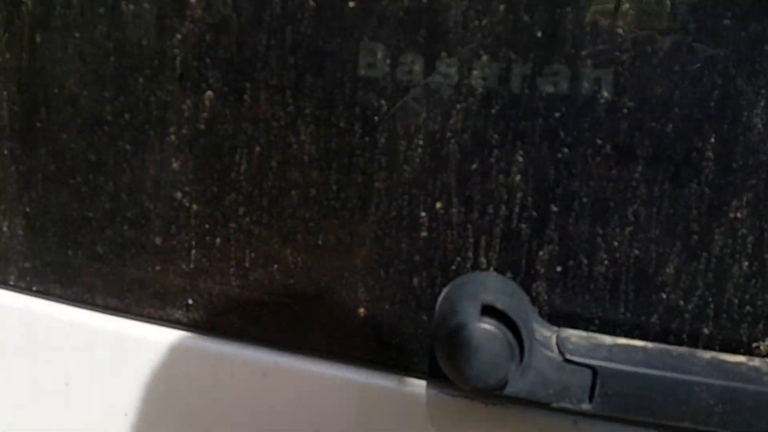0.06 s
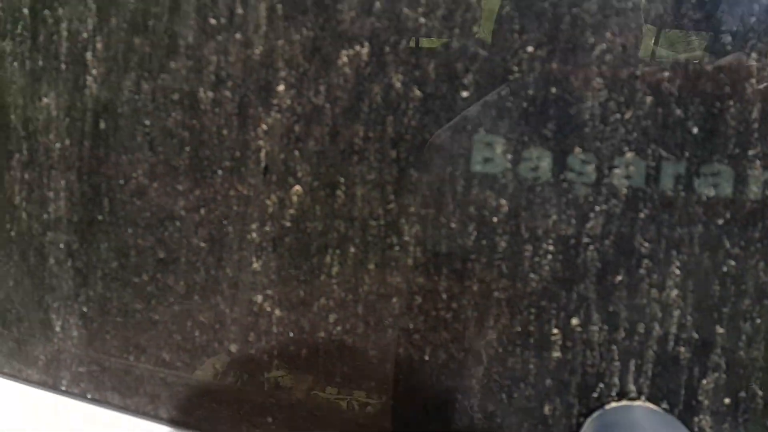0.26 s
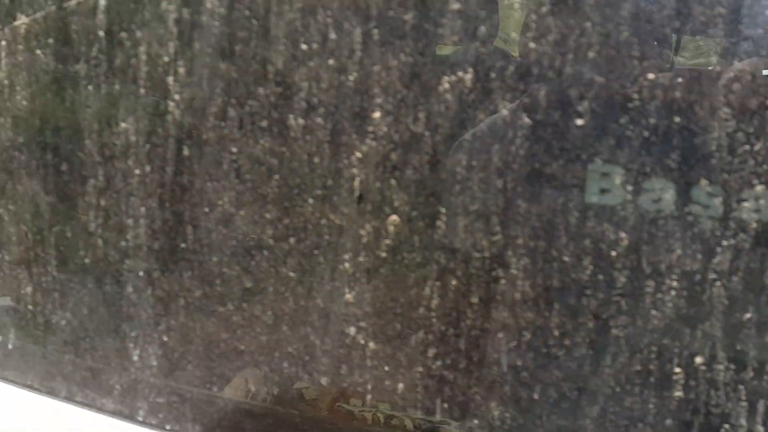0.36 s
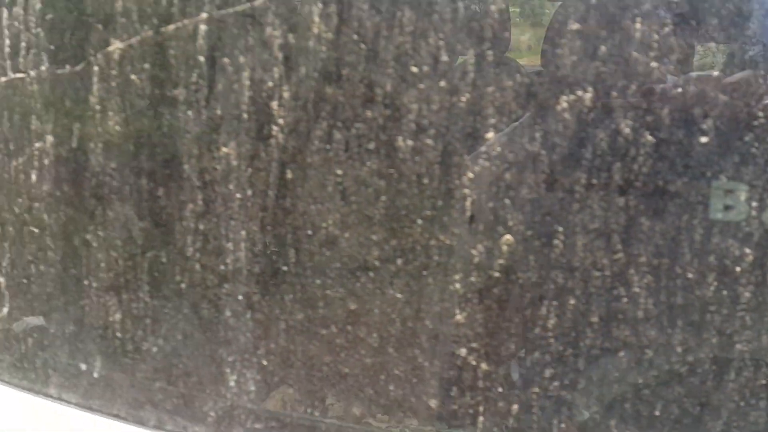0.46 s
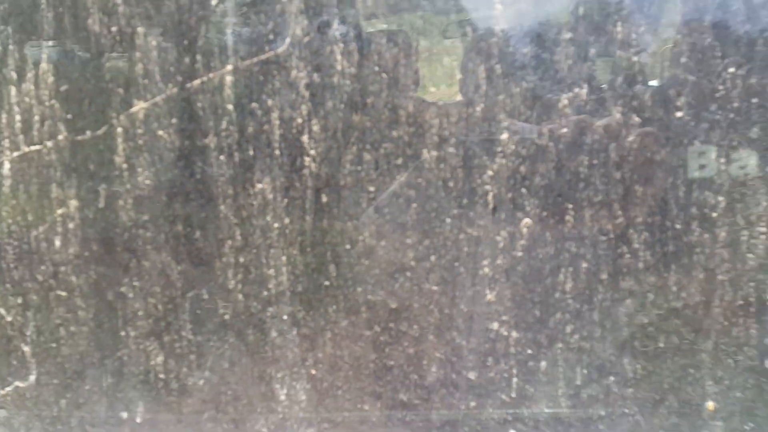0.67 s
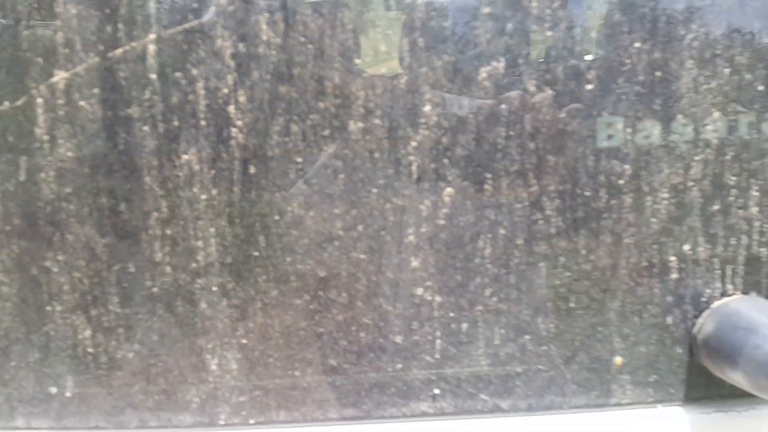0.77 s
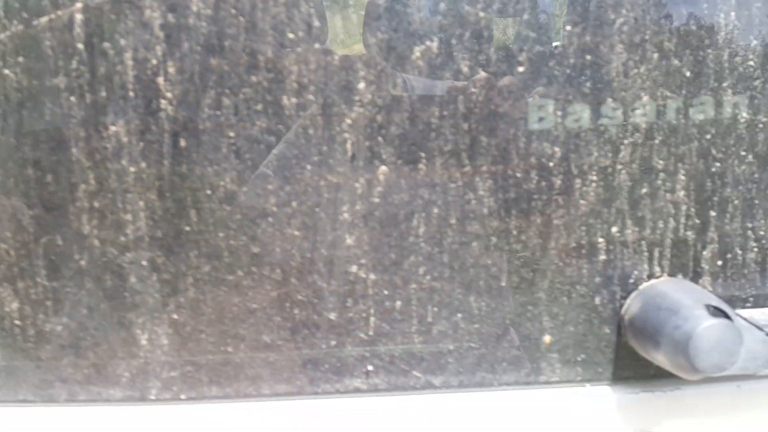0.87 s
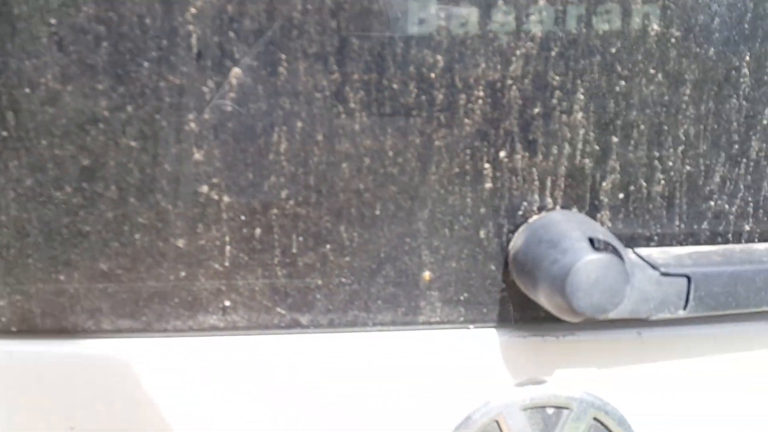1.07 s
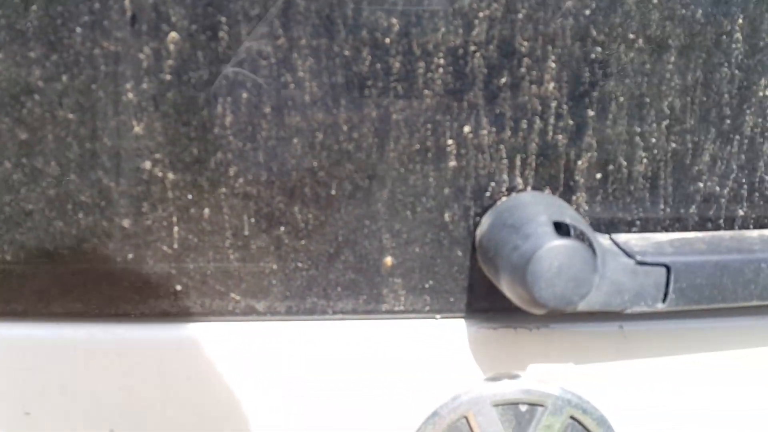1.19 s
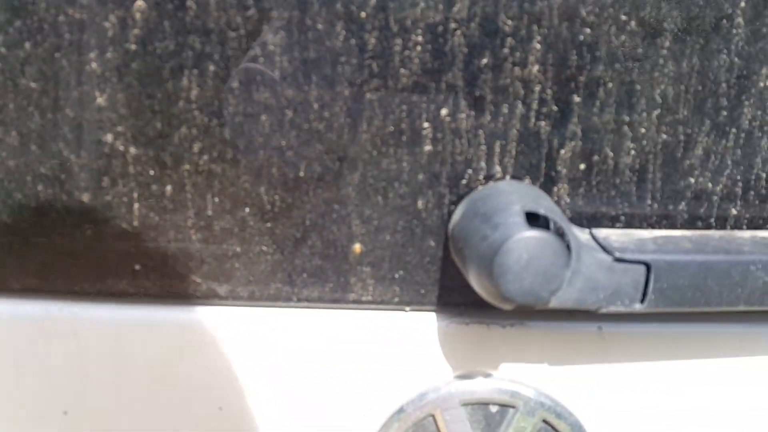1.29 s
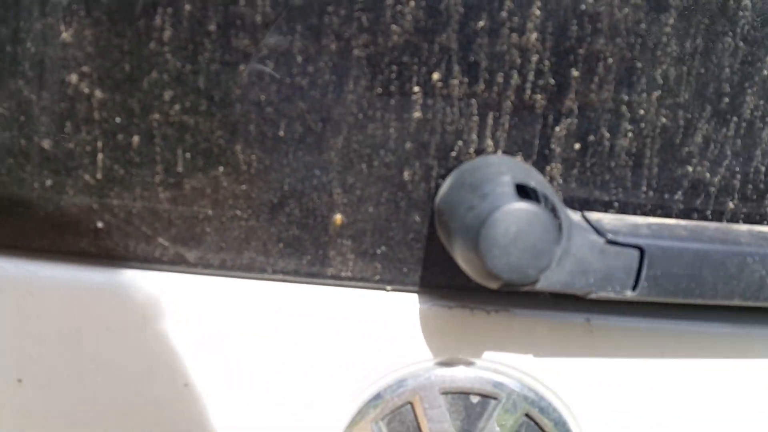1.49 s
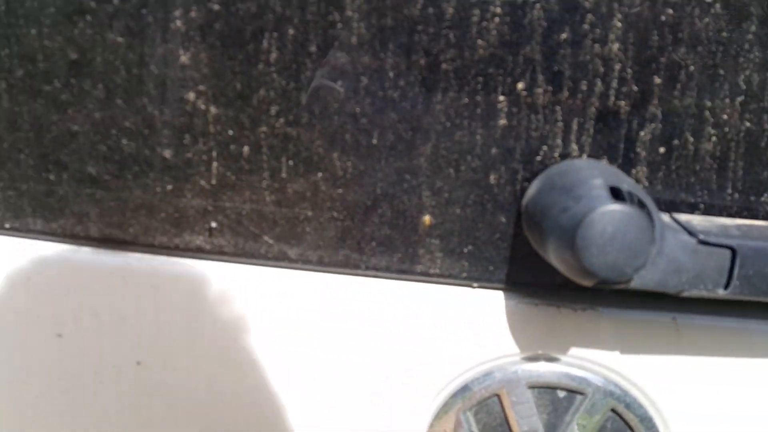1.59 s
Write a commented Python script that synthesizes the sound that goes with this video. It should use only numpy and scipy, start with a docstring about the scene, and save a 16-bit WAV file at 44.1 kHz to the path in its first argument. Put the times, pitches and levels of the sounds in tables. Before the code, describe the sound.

A van tailgate thuds heavily as its metal latch clacks without catching, light knocks before and after, then low handling bumps on the right and a sharp double click, close up in quiet open air.

```python
"""Van tailgate pushed down outdoors

The latch clacks on its striker without catching, as cracks, steel modes and a chattering ring. The door thuds as
panel modes, shudder noise and a cabin boom; its fittings tick and lighter knocks come before and after. Windowed
cosines bump the right microphone over a low rumble, and a hard edge close by slips and snaps in a scraping click.
Faint grainy scuffs, a narrow hush and two peeps lie over quiet open-air noise.
"""
import sys
import numpy as np
from scipy import signal
from scipy.fft import rfft, irfft
from scipy.io import wavfile

SR = 44100
rng = np.random.default_rng(int(sys.argv[2]) if len(sys.argv) > 2 else 0)


def wav_record(signal):
    """Record a signal, one row per channel, as 16-bit PCM in the file named by sys.argv[1]."""
    frames = np.transpose(np.atleast_2d(signal))
    bounded = np.clip(frames, -1, 1)
    # unit amplitude maps onto the largest positive 16-bit level
    quanta = np.round(bounded * 32767).astype(np.int16)
    wavfile.write(sys.argv[1], SR, quanta)


N = 72765

# place of the door: (frequency [Hz], left minus right [dB])
DOOR_SIDE = [(100, -.5), (600, -1.5), (1300, -5.5), (3000, -1), (5500, -9), (9000, -1)]
# unevenness of rubbing and length of one grain
RUB_GRAIN_DB, RUB_GRAIN_S = 4, 0.004


def amp(db):
    """Decibels to gain."""
    return 10 ** (np.asarray(db) / 20)


def unit(x):
    """Scales to rms 1."""
    return x / np.sqrt(np.mean(x ** 2) + 1e-20)


def read(points, hz):
    """Reads a table on a log-frequency axis."""
    f, value = np.transpose(points)
    return np.interp(np.log(hz + 1), np.log(f + 1), value)


def add(mix, s, sound):
    """Mixes a sound in at time s, cut at the end of the mix."""
    part = mix[:, round(s * SR):][:, :sound.shape[-1]]
    part += sound[..., :part.shape[1]]


def decay(t, t60):
    """Exponential fall of 60 dB in t60."""
    return np.exp(-np.log(1000) * t / max(t60, 1e-4))


def tilted(spectrum, hz, tilt_db):
    """A spectrum in dB, tilted by tilt_db per octave above 1 kHz."""
    return read(spectrum, hz) + tilt_db * np.log2(np.maximum(hz, 1000) / 1000)


def noise(spectrum, size, tilt_db=0, door=True):
    """Coloured stereo noise of rms 1, with the door's left-right balance or an even one."""
    # left-right likeness: (frequency [Hz], likeness [0-1])
    likeness = [(100, 0.98), (350, 0.91), (800, 0.24), (2500, 0)]
    hz = np.fft.rfftfreq(size, 1 / SR)
    a, b = np.exp(2j * np.pi * rng.random((2, len(hz))))
    same = np.clip(read(likeness, hz), 0, 1)
    side_db = read(DOOR_SIDE, hz) / 2 * door
    left = (same * a + np.sqrt(1 - same ** 2) * b) * amp(side_db)
    right = a * amp(-side_db)
    return unit(irfft(np.array([left, right]) * amp(tilted(spectrum, hz, tilt_db)), size))


def grains(size, depth_db, grain_s):
    """A gain that wanders at random from grain to grain."""
    grain = np.arange(size) / SR / grain_s
    return amp(depth_db * np.interp(grain, np.arange(size), rng.standard_normal(size)))


def swell(levels, spectrum):
    """Noise that follows a slow level curve."""
    level_db = np.interp(np.arange(N) / SR, *np.transpose(levels))
    return amp(level_db) * noise(spectrum, N, door=False)


def burst(spectrum, ring, rise_s, tilt_db=0, stretch=1, size=SR // 2):
    """Many close modes struck at once, as noise whose octaves die at their own speeds."""
    t, hz = np.arange(size) / SR, np.fft.rfftfreq(size, 1 / SR)
    centres = 2 ** np.arange(6, 15)
    z = rfft(noise(spectrum, size, tilt_db))
    out = 0
    for centre in centres:
        # overlapping triangular bands that sum to one
        band = irfft(z * read(np.c_[centres, centres == centre], hz), size)
        out = out + band * decay(t, read(ring, centre) * stretch)
    return out * np.minimum(t / rise_s, 1)


def modes(table, rise_s, stretch=1):
    """A struck body: a sum of dying partials."""
    t = np.arange(SR // 2) / SR
    partials = sum(amp(db) * np.cos(2 * np.pi * hz * t) * decay(t, t60 * stretch) for hz, db, t60 in table)
    return np.minimum(t / rise_s, 1) * partials


def crack(spectrum, tilt_db=0, door=True, size=2048):
    """One hard contact, at the door or close by: a coloured minimum-phase impulse of peak 1."""
    hz = abs(np.fft.fftfreq(size, 1 / SR))
    side_db = door * np.outer([1, -1], read(DOOR_SIDE, hz)) / 2
    gain = amp(tilted(spectrum, hz, tilt_db) + side_db)
    minimum_phase = np.exp(np.conj(signal.hilbert(np.log(gain))))
    pulse = np.fft.ifft(minimum_phase).real[:, :size // 2]
    return pulse / abs(pulse).max()


def outdoors(air_db=-55, glide_hz=120):
    """Steady coloured noise for open air; two faint peeps arch in level and pitch."""
    # open air: (frequency [Hz], relative density [dB])
    air = [(25, -5), (100, 0), (300, -7.5), (700, -10.5), (1500, -18), (3500, -24), (5500, -22),
           (8000, -34.5), (15500, -31)]
    # peeps: (time [s], length [s], top pitch [Hz], level before the left-right gains [dB])
    peeps = [(1.355, 0.061, 4380, -59.5), (1.585, 0.042, 4420, -60)]
    out = amp(air_db) * noise(air, N, door=False)
    for s, length_s, top_hz, db in peeps:
        arch = np.sin(np.pi * np.arange(0, length_s, 1 / SR) / length_s)
        phase = 2 * np.pi * np.cumsum(top_hz + glide_hz * (arch - 1)) / SR
        add(out, s, amp(db) * amp([[-6], [3]]) * arch * np.sin(phase))
    return out


def hush():
    """A narrow band of grainy noise swells under the last scuff."""
    # swell: (time [s], level before graining [dB])
    hush_level = [(1.33, -70), (1.5, -50.5), (1.65, -60.5)]
    # colour: (frequency [Hz], relative density [dB])
    hush_colour = [(700, -18), (1500, 8), (2200, -23)]
    return swell(hush_level, hush_colour) * grains(N, RUB_GRAIN_DB, RUB_GRAIN_S)


def scuffs(rise_s=0.0053, fall_s=0.069):
    """Soft rubbing: noise made uneven by random grains."""
    # strokes: (time [s], length [s], level [dB], treble tilt [dB/octave])
    strokes = [(0.683, 0.075, -39.5, 2.5), (0.697, 0.26, -56, 5), (1.488, 0.17, -41.5, 1.5)]
    # colour: (frequency [Hz], relative density [dB])
    scuff_colour = [(30, 3), (110, 17), (350, 10), (800, 4), (1500, -0.5), (2200, -6.5), (5500, -14.5),
                    (8000, -31.5), (15000, -34)]
    out, t = np.zeros((2, N)), np.arange(SR // 2) / SR
    for s, length_s, db, tilt_db in strokes:
        shape = np.clip(np.minimum(t / rise_s, (length_s - t) / fall_s), 0, 1)
        rub = grains(len(t), RUB_GRAIN_DB, RUB_GRAIN_S) * noise(scuff_colour, len(t), tilt_db, door=False)
        add(out, s, amp(db) * shape * unit(rub))
    return out


def rumble(left_db=-12):
    """Low noise, mostly on the right microphone, follows the moving hand."""
    # swell: (time [s], level before the left-right gains [dB])
    rumble_level = [(0, -45.5), (.1, -32), (.21, -35), (.64, -48), (.8, -57.5), (.92, -30), (1.15, -40.5),
                    (1.35, -56)]
    # colour: (frequency [Hz], relative density [dB])
    rumble_colour = [(25, -13), (95, 7.5), (250, -5.5), (900, -52.5)]
    return swell(rumble_level, rumble_colour) * amp([[left_db], [0]])


def bumps(width_cycles=0.5, left_leak_db=-28, lead_s=0.02):
    """Touches on the right microphone: short low pressure swings under a Gaussian."""
    # touches: (centre time [s], level at right [dB], pitch [Hz])
    touches = [(0.145, -21.5, 162), (0.151, -16, 148), (0.87, -19.5, 120), (0.8998, -16, 116),
               (0.909, -17.5, 132), (0.998, -18.5, 260), (1.008, -15.5, 145), (1.0223, -16.5, 260),
               (1.0394, -10.5, 177.5), (1.049, -17, 120), (1.138, -18.5, 154), (1.169, -26, 93)]
    out = np.zeros((2, N))
    t, ports = np.arange(-lead_s, lead_s, 1 / SR), amp([[left_leak_db], [0]])
    for s, db, hz in touches:
        swing = -np.cos(2 * np.pi * hz * t) * np.exp(-(t * hz / width_cycles) ** 2)
        add(out, s - lead_s, amp(db) * ports * swing)
    return out


def click(snap_ring_hz=830, snap_ring_db=-32, snap_ring_t60_s=0.057):
    """A hard edge slips and snaps close by; the right microphone hears it later, the recorder's body shades both."""
    # slips: (time [s], level [dB], hold before decay [s], t60 [s])
    slips = [(0.765, -46.5, 0.00074, 0.011), (1.256, -51, 0.0058, 0.074), (1.291, -27.5, 0.018, 0.017),
             (1.303, -21.5, 0.0036, 0.037)]
    # snaps: (time [s], peak level before shading [dB])
    snaps = [(1.2968, -7.5), (1.308, -7.5)]
    # edge colour: (frequency [Hz], relative density [dB])
    slip_colour = [(300, -19), (820, -11), (1300, -22), (2600, -6.5), (3550, -7), (3950, -13), (5100, 2),
                   (6150, 3.5), (6700, -7), (13000, -21), (15400, -13), (16000, -33)]
    # shading: (frequency [Hz], left minus right [dB])
    slip_side = [(4500, 0), (6000, -5.5), (8200, 9), (10200, 0)]
    # delay at right: (frequency [Hz], lag [s])
    slip_lag = [(3000, .00033), (5100, .00039), (6500, .00043), (10200, .00039), (15000, .00045)]
    edge, t, hz = np.zeros((1, N)), np.arange(SR // 10) / SR, np.fft.rfftfreq(N, 1 / SR)
    for s, db, hold_s, t60_s in slips:
        scrape = noise(slip_colour, len(t), door=False)[1]
        add(edge, s, amp(db) * scrape * decay(np.maximum(t - hold_s, 0), t60_s))
    for s, db in snaps:
        add(edge, s, amp(db) * crack(slip_colour, door=False)[0])
    # low ring left by the last snap
    add(edge, snaps[-1][0], modes([(snap_ring_hz, snap_ring_db, snap_ring_t60_s)], rise_s=0.00024))
    side_db = read(slip_side, hz) / 2
    late = np.exp(-2j * np.pi * hz * read(slip_lag, hz))
    return irfft(rfft(edge) * np.array([amp(side_db), amp(-side_db) * late]), N)


def fittings(rise_s=0.0019, t60_s=0.042, skirt_db_per_octave=23):
    """Loose fittings tick: dying noise in a narrow band around each pitch."""
    # ticks: (time [s], level before the envelope [dB], pitch [Hz])
    ticks = [(.429, -30.5, 960), (.459, -36, 1110), (.486, -36, 990), (0.536, -37, 1020),
             (0.561, -38.5, 1030), (.673, -33, 1500), (1.008, -41.5, 1530), (1.499, -40.5, 1450)]
    out, t = np.zeros((2, N)), np.arange(SR // 10) / SR
    shape = np.minimum(t / rise_s, 1) * decay(t, t60_s)
    for s, db, hz in ticks:
        colour = [(f, -skirt_db_per_octave * abs(np.log2(f / hz))) for f in (20, hz, SR / 2)]
        add(out, s, amp(db) * shape * noise(colour, len(t)))
    return out


def knocks():
    """Light knocks ring the door's modes and rattle its fittings; taps only rattle them."""
    # blows: (time [s], mode level [dB], rattle level [dB], ring length factor [-])
    light_blows = [(0.036, -25.5, -32, 0.85), (0.2307, -10.5, -21.5, 0.46), (.603, -22, -24.5, 0.79)]
    # door modes: (frequency [Hz], level [dB], t60 at factor 1 [s])
    knock_modes = [(108, -15.5, 0.67), (238, 0, 0.13), (290.7, -7, 0.28), (306, 7.5, 0.023),
                   (422.3, -17, 0.33)]
    # rattle colour: (frequency [Hz], relative density [dB])
    rattle_colour = [(50, -35), (280, 14), (700, -4), (1050, 0), (1350, -9), (1650, -2.5), (3000, -13.5),
                     (5600, -18), (7500, -39), (15000, -49)]
    # ring of rattle and taps: (frequency [Hz], t60 at factor 1 [s])
    rattle_ring = [(200, 0.34), (1500, 0.19), (7000, 0.16)]
    # taps of the loose door: (time [s], level [dB], ring length factor [-])
    taps = [(0.897, -40.5, 0.68), (1.031, -30, 0.34), (1.259, -43.5, 0.22), (1.352, -42, 0.22)]
    # tap colour: (frequency [Hz], relative density [dB])
    tap_colour = [(100, -0.5), (350, 14.5), (900, 1), (3000, -7.5), (5500, -15.5), (8000, -52)]
    out = np.zeros((2, N))
    for s, db, rattle_db, stretch in light_blows:
        add(out, s, amp(db) * modes(knock_modes, rise_s=0.0036, stretch=stretch))
        add(out, s, amp(rattle_db) * burst(rattle_colour, rattle_ring, rise_s=0.0042, stretch=stretch))
    for s, db, stretch in taps:
        add(out, s, amp(db) * burst(tap_colour, rattle_ring, rise_s=0.00022, stretch=stretch))
    return out


def door(panel_db=-3.5, shudder_db=-4, cabin_hz=39, cabin_t60_s=0.36, cabin_rise_s=0.015):
    """Each blow rings the panel, shakes the bodywork and pumps the cabin air."""
    # blows: (time [s], panel and shudder level [dB], cabin boom level [dB])
    thuds = [(0.2605, -11, -30.5), (0.283, -23.5, -34), (0.3213, -13.5, -30.5), (.334, -15.5, -22.5)]
    # panel modes: (frequency [Hz], relative level [dB], t60 [s])
    panel_modes = [(83.8, -8.5, 0.17), (120, -1, 0.39), (181.1, -5.5, 0.36), (260, -0.5, 0.25),
                   (283, -10, 0.19), (324.5, -4.5, 0.14), (463.7, -10.5, 0.23), (563, -25, 0.3)]
    # bodywork colour: (frequency [Hz], relative density [dB])
    shudder_colour = [(25, -31), (70, -4), (130, 0.5), (300, 1), (450, -12.5), (700, -18), (1500, -60.5)]
    # bodywork ring: (frequency [Hz], t60 [s])
    shudder_ring = [(50, 0.47), (250, 0.42), (800, 0.38)]
    out, t = np.zeros((2, N)), np.arange(SR // 2) / SR
    panel = amp(panel_db) * modes(panel_modes, rise_s=0.0011)
    cabin = np.sin(2 * np.pi * cabin_hz * t) * np.minimum(t / cabin_rise_s, 1) * decay(t, cabin_t60_s)
    for s, db, boom_db in thuds:
        shudder = amp(shudder_db) * burst(shudder_colour, shudder_ring, rise_s=0.0014)
        add(out, s, amp(db) * (panel + shudder) + amp(boom_db) * cabin)
    return out


def latch(contact_s=0.001, crack_db=1.5, chatter_db=6, chatter_grain_s=0.0021):
    """Latch on striker: each clack is a hard crack, a few steel modes and a dense, chattering ring."""
    # clacks: (time [s], level [dB], treble tilt [dB/octave], ring length factor [-])
    clacks = [(0.229, -24.5, 2.5, 1.4), (0.2362, -17.5, -4.5, 0.43), (0.2528, -21, 8.5, 1.19),
              (0.257, -10.5, 0, 0.23), (0.302, -29.5, 3.5, 3.1), (0.3149, -20.5, 2, 0.96),
              (0.3332, -22.5, 0.5, 1.1), (0.3431, -21.5, 0, 1.19), (.364, -25.5, -9.5, 1.07),
              (0.3954, -29.5, -1, 0.93)]
    # latch colour: (frequency [Hz], relative density [dB])
    clack_colour = [(150, -15), (450, 1.5), (700, -1.5), (1000, 4), (1950, -2), (2600, -7), (4200, -14.5),
                    (5500, -15), (7200, -34.5), (10500, -33), (16000, -41.5)]
    # latch ring: (frequency [Hz], t60 at factor 1 [s])
    clack_ring = [(400, 0.12), (1200, 0.11), (5000, 0.1), (12000, 0.0089)]
    # steel modes: (frequency [Hz], relative level [dB], t60 [s])
    steel_modes = [(995, -18.5, 0.18), (1095, -19.5, 0.26), (1604, -18, 0.17), (1854, -11.5, 0.045),
                   (5400, -43, 0.06)]
    out, t = np.zeros((2, N)), np.arange(SR // 2) / SR
    steel = modes(steel_modes, rise_s=0.00027) * amp([[-3], [2]])
    for s, db, tilt_db, stretch in clacks:
        ring = burst(clack_colour, clack_ring, rise_s=0.00046, tilt_db=tilt_db, stretch=stretch)
        # chatter deepens as the ring goes on
        chatter = grains(len(t), chatter_db, chatter_grain_s) ** (1 - decay(t, 0.29))
        add(out, s, amp(db) * (steel + ring * chatter))
        add(out, s + contact_s, amp(db + crack_db) * crack(clack_colour, tilt_db))
    return out


def scene():
    """Sum of all sources."""
    background = outdoors() + hush() + scuffs()
    handling = rumble() + bumps()
    tailgate = fittings() + knocks() + door() + latch()
    return background + handling + click() + tailgate


def record(dry, edge_hz=16300):
    """The recorder's band limit: a linear-phase low-pass."""
    lowpass = signal.firwin(511, edge_hz, window=("kaiser", 9), fs=SR)
    return signal.oaconvolve(dry, lowpass[None], "same")


dry = scene()
out = record(dry)
wav_record(out)
```